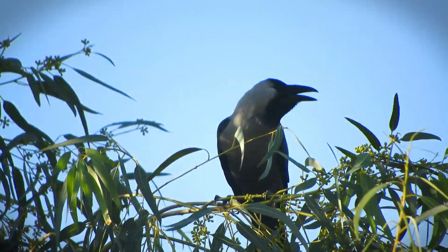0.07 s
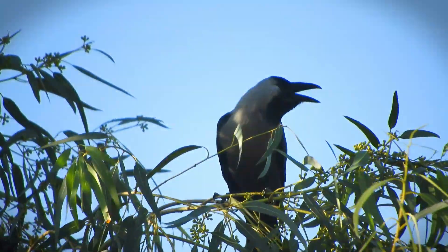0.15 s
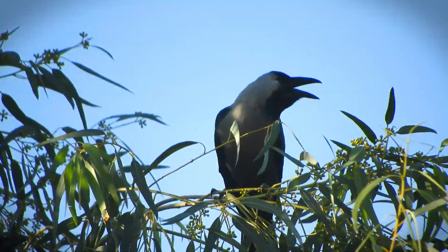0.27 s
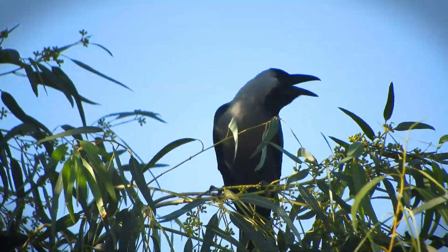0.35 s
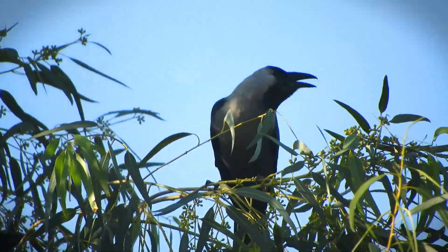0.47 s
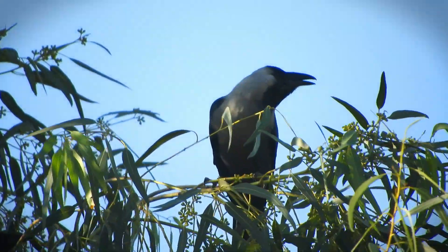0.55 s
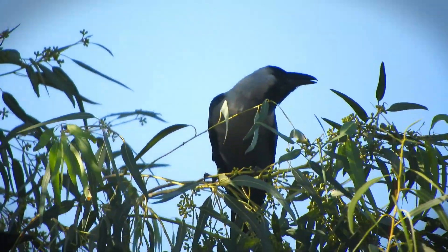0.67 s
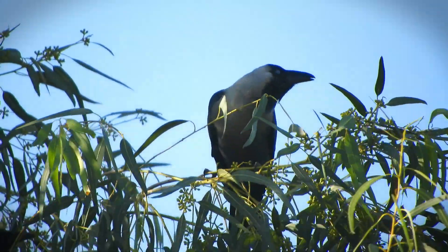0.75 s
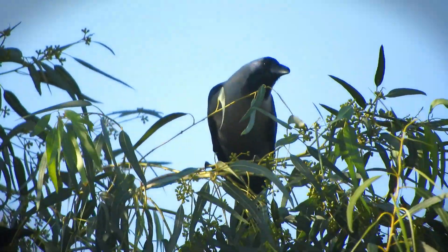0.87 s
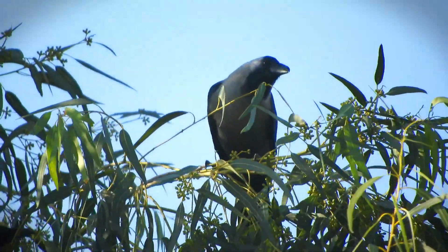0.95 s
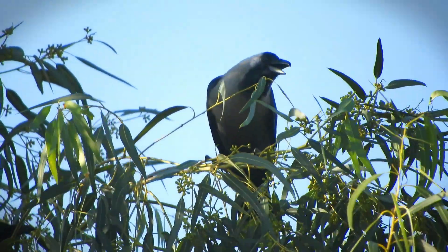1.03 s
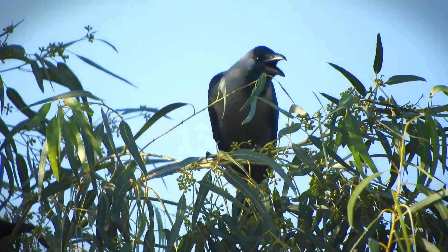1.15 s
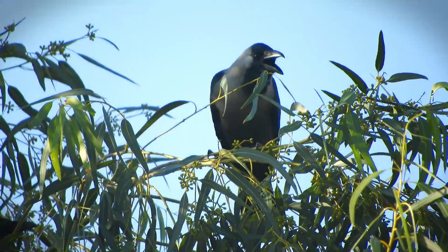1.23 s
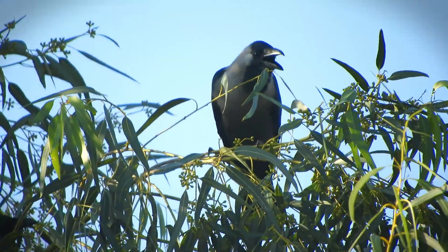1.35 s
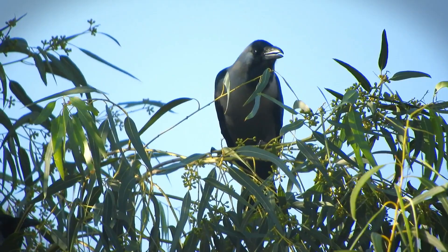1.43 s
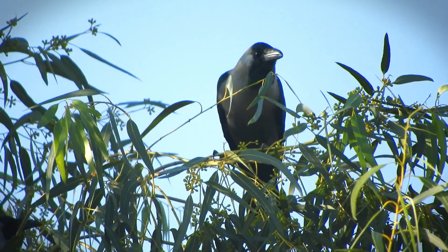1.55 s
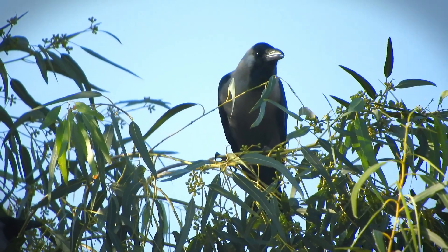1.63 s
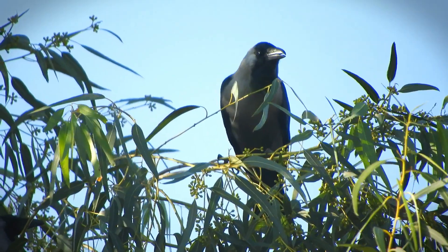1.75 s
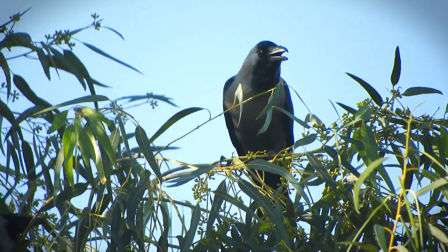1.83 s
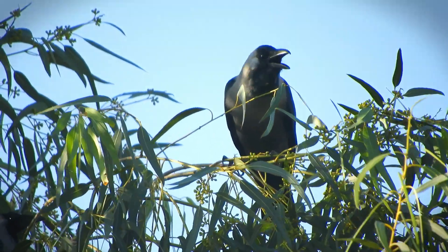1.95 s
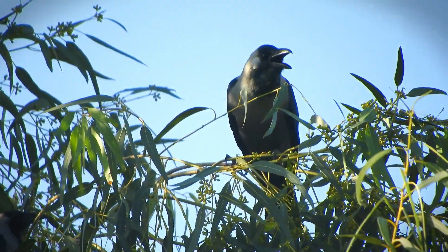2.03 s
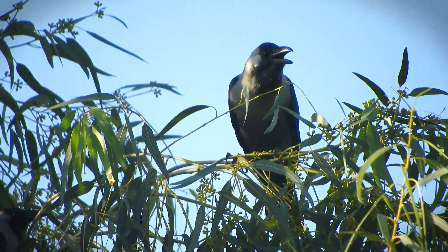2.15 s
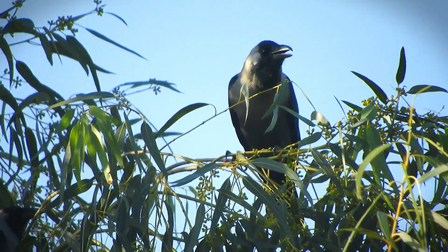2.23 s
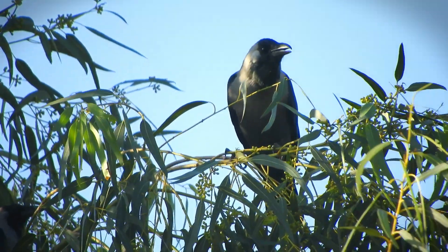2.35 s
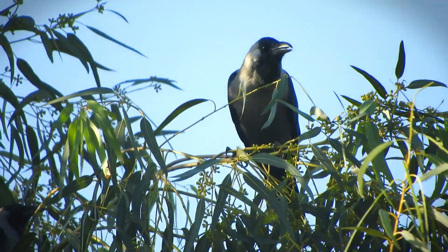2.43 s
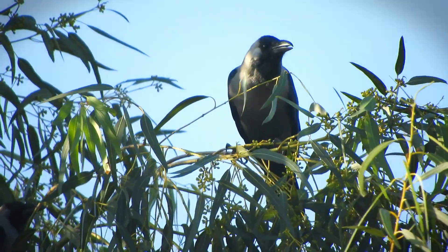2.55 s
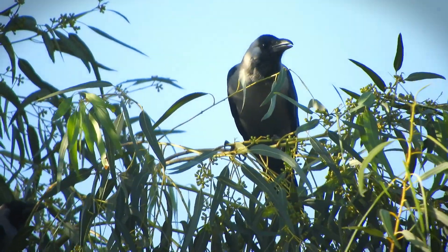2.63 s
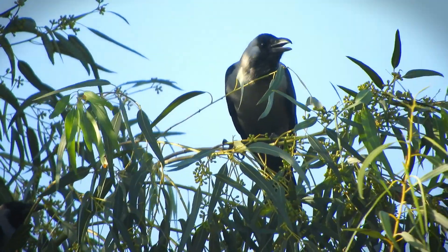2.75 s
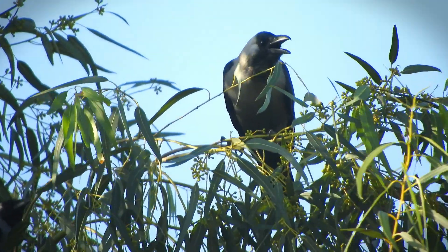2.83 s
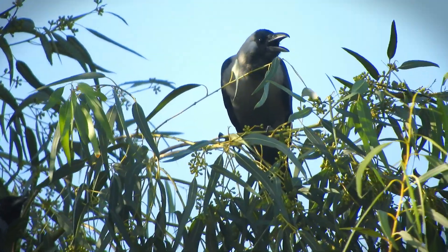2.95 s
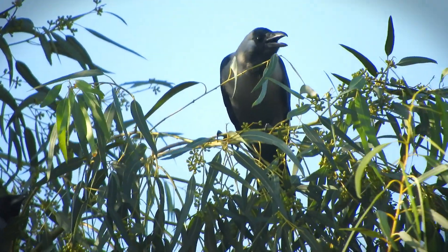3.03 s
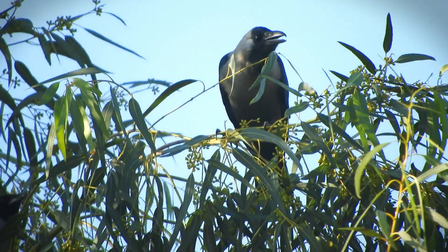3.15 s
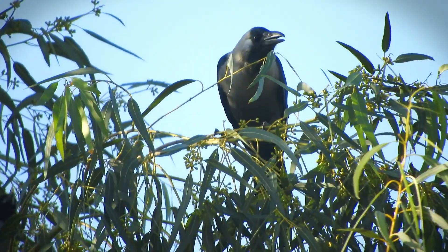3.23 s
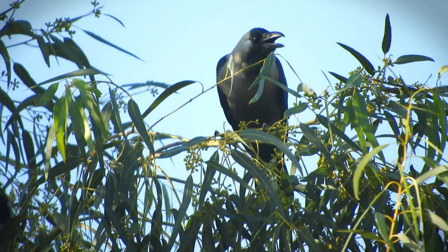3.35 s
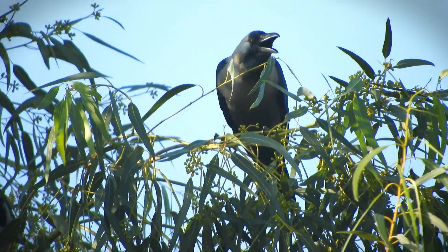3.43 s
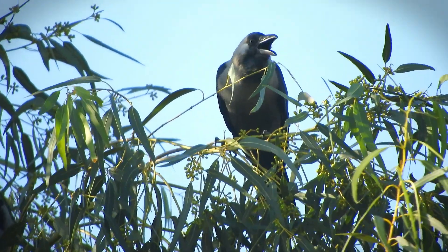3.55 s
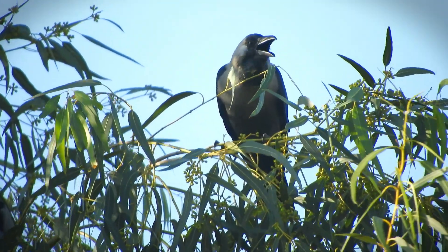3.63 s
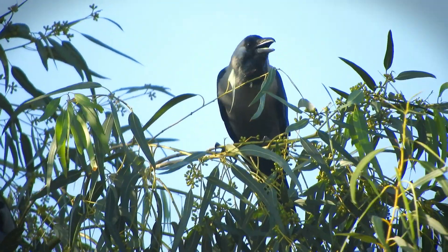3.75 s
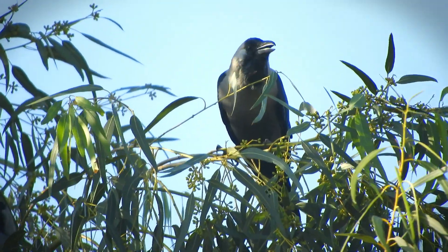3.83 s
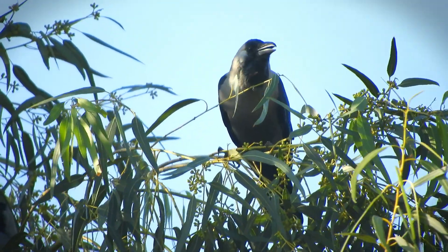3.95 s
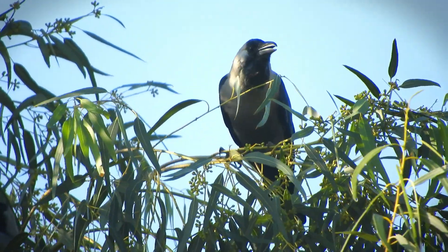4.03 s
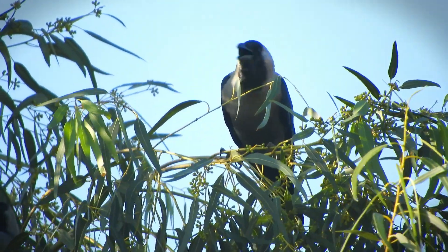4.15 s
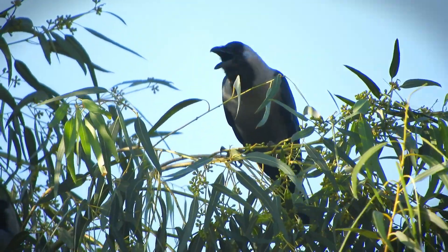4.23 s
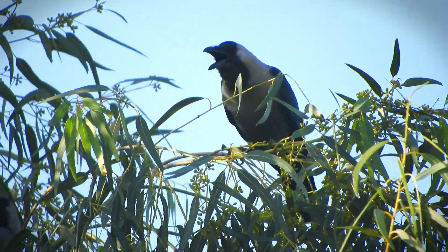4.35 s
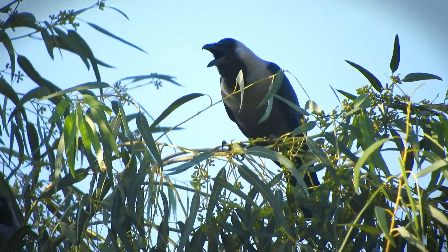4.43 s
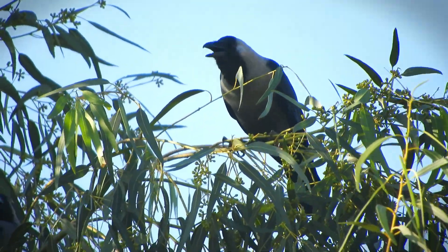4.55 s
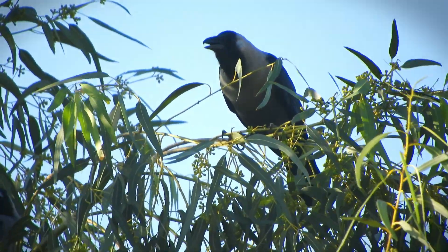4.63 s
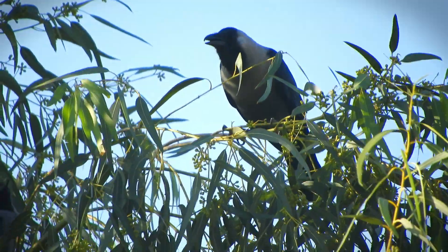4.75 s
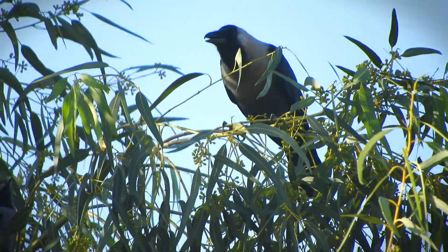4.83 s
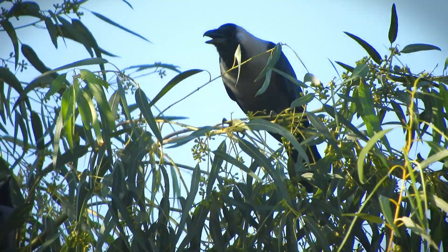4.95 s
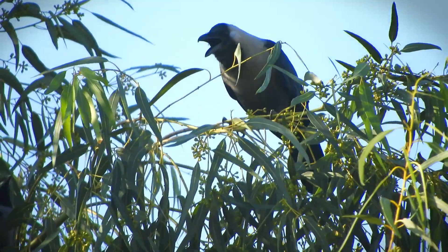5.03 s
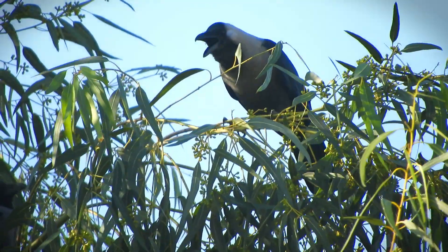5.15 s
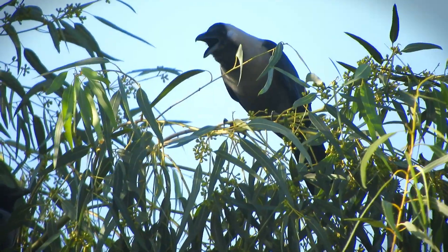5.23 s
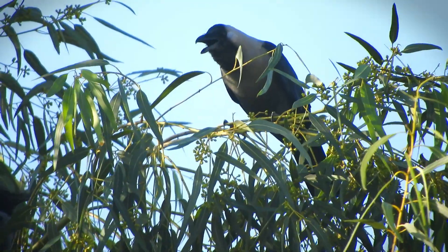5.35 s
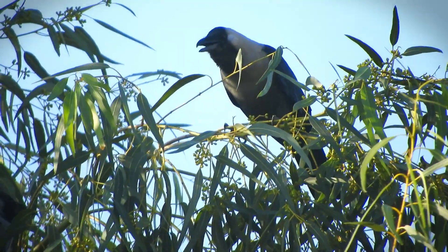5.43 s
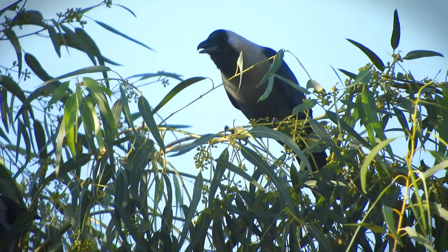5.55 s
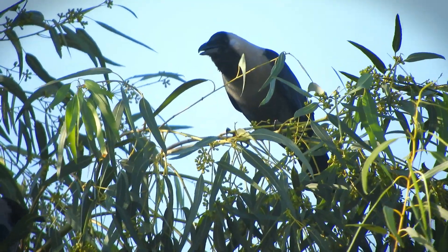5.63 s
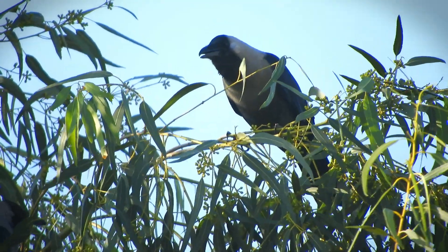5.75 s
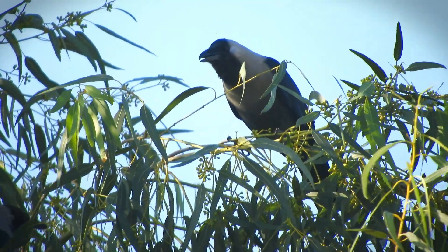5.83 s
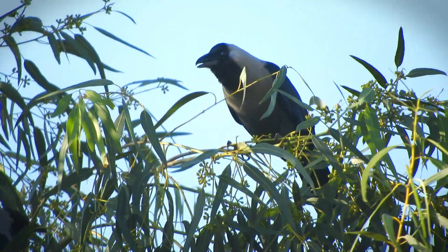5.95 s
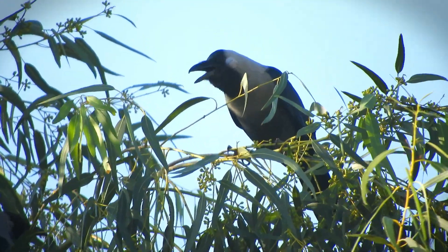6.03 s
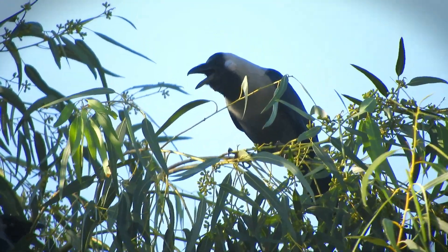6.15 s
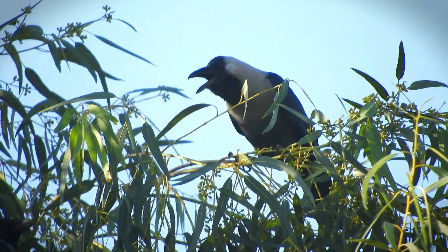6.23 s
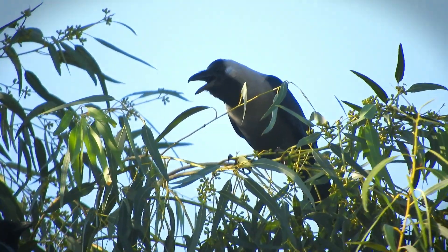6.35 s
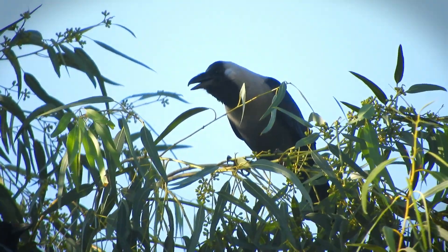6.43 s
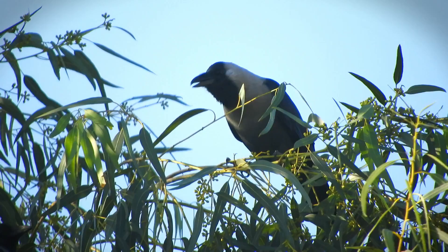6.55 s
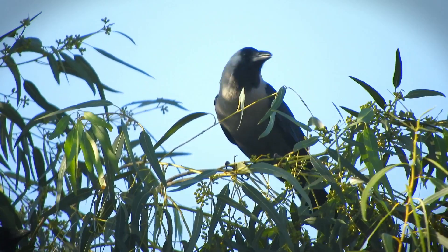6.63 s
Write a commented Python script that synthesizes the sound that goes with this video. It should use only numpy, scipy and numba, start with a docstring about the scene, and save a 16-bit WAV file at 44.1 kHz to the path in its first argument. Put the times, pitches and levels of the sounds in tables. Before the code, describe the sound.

Outdoors among leaves, crows caw in rough, nasal bursts of about four tenths of a second, first in pairs, then almost continuously and overlapping. Small birds add fast, sharp chirps and twitters, more frequent late. A very distant cock crows underneath, a few soft dull thumps come mostly in the later part, and a faint traffic rumble stays steady. Nearly mono, lightly reverberant.

```python
"""A small bird chips over the low hum of a town and at once a crow caws; more caws follow and overlap.
Each caw is a train of pulses near 440 Hz whose pitch is thrown up and down about 75 times a second;
the pulses ring throat, windpipe and beak, with a noisy rasp above them. Small birds are gliding whistles,
a far cock is a stack of harmonics, and the soft thumps, the town and its hum are filtered noise."""
import sys
import numpy as np
from scipy import signal
from scipy.fft import rfft, irfft
from scipy.io import wavfile
from scipy.ndimage import uniform_filter1d
from numba import njit

SR = 44100
rng = np.random.default_rng(int(sys.argv[2]) if len(sys.argv) > 2 else 0)


def int16_out(signal):
    """Quantize to a 16-bit WAV file."""
    q = np.round(np.clip(np.atleast_2d(signal).T, -1, 1) * 32767)
    wavfile.write(sys.argv[1], SR, q.astype(np.int16))


N = 294588
T = np.arange(N) / SR  # time in seconds

# One row per caw: start_s, crest_s, end_s, crest_pitch_hz, pitch_sag_at_ends (share), flutter_hz,
# roughness (0-1), level_db, beak_hz at mid-caw, then against the beak:
# throat_db, windpipe_db, rasp_db, low_rasp_db
CAWS = [ (.047, 0.197, .424, 415, 0.33, 75.8, 0.5, -27.5, 1865, -15, -13.5, -15.5, -36),
        (0.286, .51, .703, 423.5, .17, 70.1, 0.2, -23, 1720, -16, -18, -23, -48),
        (1.218, 1.469, 1.631, 427, 0.16, 67.35, 0.24, -21.5, 1743, -18, -19, -20, -40),
        (1.356, 1.558, 1.748, 443, 0.2, 80.25, 0.38, -24, 1845, -12, -16, -13, -39),
        (1.868, 2.081, 2.296, 430.2, 0.21, 75.54, 0.51, -23, 1826, -12.5, -15, -12.5, -25),
        (2.046, 2.248, 2.413, 426.2, .18, 69.04, 0.21, -22.5, 1700, -15.5, -26, -20.5, -29),
        (2.459, 2.676, 2.85, 432.7, 0.25, 78.46, 0.6, -22.5, 1804, -11, -22, -14, -25.5),
        (2.956, 3.211, 3.404, 460, 0.27, 78.8, 0.55, -19.5, 1853, -14, -17.5, -13, -24),
        (3.476, 3.709, 3.956, 475, 0.31, 79.7, 0.45, -18.5, 1940, -13.5, -16.5, -15.5, -30),
        (3.551, 3.813, 3.981, 438.2, 0.3, 74.07, 0.35, -17.5, 1804, -15, -27, -16, -24.5),
        (3.972, 4.217, 4.439, 446.4, .16, 77.15, 0.24, -21.5, 1900, -10.5, -19, -19, -25.5),
        (4.183, 4.461, 4.616, 453, 0.29, 78.6, 0.4, -18, 1950, -10, -10, -17.5, -19.5),
        (4.329, 4.519, 4.76, 426.8, .1, 70.7, 0.23, -19.5, 1790, -27, -32, -20.5, -33),
        (4.605, 4.868, 5.117, 457.5, 0.21, 81.8, 0.18, -20.5, 1980, -11, -12.5, -17.5, -21),
        (4.831, 5.019, 5.304, 439.6, 0.36, 75.6, .42, -26, 1805, -13, -22, -15, -14.5),
        (5.138, 5.421, 5.546, 440.1, 0.23, 76.75, 0.48, -20, 1774, -14.5, -9, -19, -23.5),
        (5.23, 5.539, 5.758, 445, .15, 76.86, 0.22, -18, 1860, -12, -25, -19.5, -23.5),
        (5.644, 5.841, 6.002, 428, 0.23, 77.2, 0.49, -24, 1840, -14, -20, -13.5, -22),
        (6.054, 6.286, 6.535, 450.5, 0.19, 76.17, 0.24, -19, 1885, -10.5, -21, -19.5, -26),
        (6.207, 6.399, 6.638, 438.5, 0.16, 74.15, .35, -22.5, 1810, -16.5, -24, -18, -19),
        (6.575, 6.803, 7.0, 441, 0.37, 78, 0.38, -30, 1810, -15, -15, -15, -30)]
# Colour of the rasp: frequency_hz, relative_level_db
RASP_COLOUR = [(2000, -72), (2700, -14), (3300, -12.5), (3800, -16), (4280, 2.5), (4800, -0.5),
               (5700, -3.5), (6800, -6), (8000, -6.5), (9000, -11.5), (10000, -21), (13000, -28.5),
               (15500, -44)]
# What the crow's airway lets through, most from 700 to 1150 Hz: frequency_hz, gain_db
TRACT = [(300, -27), (450, -13.5), (590, 3.5), (700, 9.5), (920, 9.5), (1030, 12), (1150, 9.5), (2200, 0.5),
         (2450, -7), (2800, -6), (4000, -8.5)]

# Song figures of the small birds, before each chirp's own pitch ratio and level:
# time_from_start_s, pitch_hz, level_db
TWITTER = [(0, 3147, 11), (.007, 6070, -12), (.014, 4900, -5.5), (.022, 3830, -7.5), (0.034, 5000, -3.5),
           (.045, 4334, 1), (.055, 3150, -6.5), (.063, 3390, -5.5), (.082, 4300, 0), (.102, 3300, -12)]
CHIP = [(0, 3270, -16.5), (0.014, 5560, -3.5), (0.027, 3930, -5.5), (0.036, 3100, -10), (0.047, 3660, -7),
        (0.067, 2600, -14)]
SLUR = [(0, 5200, -6), (.025, 4166, 3.5), (.045, 3200, -2.5), (.06, 2700, 4.5), (.1, 2550, 8),
        (.14, 1900, -3)]
DROP = [(0, 7300, -12), (0.023, 5100, 1), (.04, 3100, -6)]
ARCH = [(0, 3120, 4), (.01, 4400, 0), (0.028, 4200, 4.5), (.04, 3100, 1)]
CHURR = [(0, 2468, 11), (0.021, 2850, 9), (.05, 2590, 8), (.08, 2800, 3.5), (.11, 2650, -5)]
# When the small birds sing: start_s, figure, pitch_ratio, level_db, warble (share of the pitch)
CHIRPS = [ (.002, CHIP, 1, -26, 0.03), (0.321, DROP, 1, -30, 0.017), (0.38, ARCH, 0.97, -34, 0.047),
          (0.668, CHURR, 1.12, -57.5, 0.067), (1.026, TWITTER, 1.022, -26.5, 0.036),
          (1.921, TWITTER, 1.05, -24, 0.04), (2.392, SLUR, .95, -46.5, 0.025),
          (2.867, TWITTER, 1.033, -26.5, .05), (3.219, CHIP, .86, -28, 0.028),
          (3.456, CHURR, 1.01, -54, 0.034), (3.967, CHIP, 0.99, -27.5, 0.024),
          (4.696, SLUR, 1.01, -39, 0.019), (4.747, CHURR, 0.81, -36.5, 0.07),
          (4.96, CHIP, 0.87, -29.5, 0.029), (5.052, CHURR, 1.18, -42.5, 0.081),
          (5.343, SLUR, 0.93, -32, 0.017), (5.517, TWITTER, 1.08, -24.5, 0.064),
          (5.75, CHURR, 1.05, -45, 0.05), (5.925, SLUR, 0.99, -34, 0.031),
          (5.976, TWITTER, 1.1, -24, 0.052), (6.469, TWITTER, 0.99, -27, 0.0524),
          (6.52, CHURR, 0.99, -44.5, 0.025)]

# Path of the far cock's call: time_s, pitch_hz, level_db
COCK = [(1.72, 675, -79), (1.79, 703, -49), (1.86, 725, -51), (1.92, 696, -55), (2.1, 815, -42),
        (2.3, 820, -43.5), (2.48, 840, -39.5), (2.62, 827, -43), (2.76, 811, -52), (2.87, 795, -46),
        (2.98, 788, -42.5), (3.15, 790, -51)]
# Peaks and dips of the cock's throat: frequency_hz, gain_db
COCK_THROAT = [(700, 5.5), (800, -10.5), (1400, -1), (1600, 4.5), (2350, -22), (2500, -0.5), (2800, -13),
               (3140, -2), (3300, -13)]
# Soft low thumps: centre_s, level_db, spread_s, filter_centre_hz, filter_width_hz
THUMPS = [(0.73, -43.5, 0.019, 340, 136), (4.43, -41.5, 0.06, 390, 87), (5.095, -40, 0.016, 390, 103),
          (5.23, -29.5, 0.027, 336, 277), (5.338, -38.5, 0.039, 312, 219.6), (5.74, -41, 0.023, 370, 89),
          (6.144, -36, 0.021, 334, 109)]
# Colour of the town's wash: frequency_hz, relative_level_db (per Hz)
TOWN_COLOUR = [(25, -14), (45, -15.5), (65, -1.5), (110, -5), (200, 1), (260, -14.5), (380, -22),
               (650, -14.5), (950, -21), (1700, -15.5), (2800, -26), (5000, -22), (8000, -27.5),
               (15000, -45.5)]
# Hum of the town: centre_hz, filter_width_hz, level_db
HUM = [(101.5, 41, -57.5), (172.8, 23, -52.5)]

# Colours of the echo, the left-right scatter and the left-right hiss: frequency_hz, gain_db
ECHO_COLOUR = [(500, 0), (3000, 0), (10000, -4)]
SCATTER_COLOUR = [(800, -19.5), (1800, -33.0), (3000, -16.0), (5000, -17.5), (8000, -8.0), (12000, -17.5)]
HISS_COLOUR = [(40, -24.0), (180, -14), (400, -23.5), (1500, -22.0), (6000, -25.5), (10000, -32.5),
               (15000, -44)]

# Every caw swells, holds a rounded top and breaks off
ATTACK_S, ATTACK_CURVE = .13, 1.26
RELEASE_S, RELEASE_CURVE = 0.077, 1.61
DOME_DB = 7  # the middle over the two ends
# As the push gives out the pitch collapses: share lost, time constant in seconds
PITCH_DROP, DROP_S = .22, .035
THROAT_HZ = 792  # at mid-caw; it moves with the beak
BEAK_RISE, BEAK_SAG = 0.081, 0.088  # the beak's movement, as shares of its resonance
WAVER_DB, WAVER_RATE = 2.5, 18  # chance waver of throat and windpipe; changes a second
# How steeply each part follows the push: throat and windpipe speak first and last, the rasp needs force
THROAT_POWER, WINDPIPE_POWER, RASP_POWER = 0.94, 0.73, 1.08
TOWN_DB = -45.5
TOP_HZ = 15200


def undb(db):
    """Decibels to gain."""
    return 10 ** (np.asarray(db) / 20)


def unit(x):
    """Scale to an rms level of 1."""
    return x / np.sqrt(np.mean(x ** 2))


def curves(rows, t=T):
    """Join the columns of a table by straight lines in time."""
    s, *columns = np.transpose(rows)
    return [np.interp(t, s, column) for column in columns]


def walk(rate, size=N):
    """Smooth random wandering with rms 1 that heads for a new value rate times a second."""
    step = max(int(SR / rate), 2)
    held = np.repeat(rng.standard_normal(size // step + 1), step)
    return unit(uniform_filter1d(held, step))[:size]


def colour(x, points):
    """Filter by (Hz, dB) points, with no sound ahead of its cause."""
    hz, db = np.transpose(points)
    grid_hz = np.linspace(1, SR / 2, 2049)
    gain = undb(np.interp(np.log(grid_hz), np.log(hz), db))
    # folding the cepstrum forward gives the minimum-phase filter
    cepstrum = irfft(np.log(gain))
    cepstrum[1:2048] *= 2
    cepstrum[2049:] = 0
    impulse = irfft(np.exp(rfft(cepstrum)))
    return signal.fftconvolve(x, impulse)[:len(x)]


@njit
def svf(x, hz, width):
    """State-variable band-pass whose centre may move."""
    y, band, low = np.empty(len(x)), 0., 0.
    for i in range(len(x)):
        g, k = np.tan(np.pi * hz[i] / SR), width / hz[i]
        v = (band + g * (x[i] + 1e-18 - low)) / (1 + g * (g + k))
        band, low, y[i] = 2 * v - band, low + 2 * g * v, k * v
    return y


def resonance(x, hz, width_hz):
    """A steep resonance: the band-pass twice."""
    hz = hz * np.ones(len(x))
    once = svf(x, hz, float(width_hz))
    return svf(once, hz, float(width_hz))


def steady(x, span_s=0.067):
    """Even out the slow level but keep the quick flutter."""
    power = uniform_filter1d(x ** 2, int(span_s * SR))
    return x / np.sqrt(np.abs(power) + .015 * np.mean(x ** 2))


def crows():
    """The caws of several birds, one over another."""
    out = np.zeros(N)
    for start, crest, end, *voice in CAWS:
        span = (T >= start) & (T < end)
        out[span] += caw(T[span], start, crest, end, *voice)
    return out


def caw(t, start, crest, end, pitch_hz, sag, flutter_hz, rough, db, beak_hz,
        throat_db, windpipe_db, rasp_db, low_rasp_db):
    """One push of air through syrinx, throat, windpipe and beak, with a rasp above them."""
    size = len(t)
    along = np.interp(t, [start, end], [-1, 1])
    attack = np.clip((t - start) / ATTACK_S, 0, 1) ** ATTACK_CURVE
    release = np.clip((end - t) / RELEASE_S, 0, 1) ** RELEASE_CURVE
    push = attack * release * undb(-DOME_DB * along ** 2)

    from_crest = np.interp(t, [start, crest, end], [-1, 0, 1])
    arch = (1 - sag * from_crest ** 2) * (1 - PITCH_DROP * np.exp((t - end) / DROP_S))
    voice, air = syrinx(arch, pitch_hz, flutter_hz, rough)
    tract = colour(voice, TRACT)

    opening = 1 + BEAK_RISE * along - BEAK_SAG * along ** 2
    beak = resonance(tract, beak_hz * opening, 615) + undb(-16) * resonance(tract, 2163, 255)
    beak = push * steady(beak)

    throat_gain = undb(throat_db + WAVER_DB * walk(WAVER_RATE, size)) * push ** THROAT_POWER
    throat = throat_gain * steady(resonance(tract, THROAT_HZ * opening, 550))
    windpipe_gain = undb(windpipe_db + WAVER_DB * walk(WAVER_RATE, size)) * push ** WINDPIPE_POWER
    windpipe = windpipe_gain * steady(resonance(tract, 1325, 183))

    rasp = undb(rasp_db) * steady(colour(air, RASP_COLOUR))
    rasp = rasp + undb(low_rasp_db) * steady(resonance(air, 3340, 1160))
    return undb(db) * (beak + throat + windpipe + push ** RASP_POWER * rasp)


def syrinx(arch, pitch_hz, flutter_hz, rough, throb_db=1.45, throb_lead=0.93, rasp_throb_db=2.0,
           rasp_lead=2.7, ring=1.95, whistle=2.1):
    """The voice box makes pulses, and air whose hiss starts afresh with each cycle of the pitch."""
    # arch is the pitch as a share of pitch_hz; the two leads are in radians
    size = len(arch)
    rough = np.clip(rough, .1, .6)
    clear = (1 - rough) ** 4

    # a slower second vibration jerks the pitch up and lets it slide down again
    flutter_rate = flutter_hz * np.sqrt(arch) * (1 + .14 * rough * walk(70, size))
    flutter = 2 * np.pi * np.cumsum(flutter_rate) / SR
    slide = (.075 + .05 * rough) * (np.sin(flutter) + .15 * np.sin(2 * flutter))
    jitter = .042 * rough * walk(350, size)
    cycles = np.cumsum(pitch_hz * arch * (1 + slide + jitter)) / SR

    # one pulse a cycle, shared between the two nearest samples
    closures = np.interp(np.arange(1, cycles[-1]), cycles, np.arange(size))
    strength = undb(4.5 * rough * rng.standard_normal(size)[:len(closures)])
    sample, fraction = closures.astype(int), closures % 1
    pulses = np.zeros(size + 1)
    np.add.at(pulses, sample, strength * (1 - fraction))
    np.add.at(pulses, sample + 1, strength * fraction)
    pulses = unit(pulses[:size])
    air = unit(np.exp(-(cycles % 1) / 1.34) * rng.standard_normal(size))

    voice = (pulses + .8 * rough ** 2 * air) * undb(-throb_db * np.cos(flutter + throb_lead))
    # in a clear caw the tract is tuned near the fourth harmonic and rings with it
    voice = voice + ring * clear * resonance(voice, 4.07 * pitch_hz * np.sqrt(arch), 220)

    rasp = (0.32 * pulses + air) * undb(-rasp_throb_db * np.cos(flutter + rasp_lead))
    # a hoarse caw hisses high, a clear one rings a windpipe mode
    high_hiss = 2.5 * rough * resonance(rasp, 6200, 3000)
    windpipe_mode = whistle * clear * resonance(pulses, 4300, 350)
    return voice, rasp + high_hiss + windpipe_mode


def small_birds(overtone_db=-27, second_voice_db=-7, second_ratio=0.88, flicker_db=3):
    """Quick whistles; in a twitter the other side of the syrinx sings along a little lower."""
    out = np.zeros(N)
    for start, figure, ratio, db, warble in CHIRPS:
        span = (T >= start) & (T < start + figure[-1][0])
        hz, shape_db = curves(figure, T[span] - start)
        size = len(hz)
        pitch = uniform_filter1d(hz, 200) * ratio * (1 + warble * walk(600, size))
        phase = 2 * np.pi * np.cumsum(pitch) / SR
        tone = np.sin(phase) + undb(overtone_db) * np.sin(2 * phase)
        if figure is TWITTER:
            tone = tone + undb(second_voice_db) * np.sin(second_ratio * phase)
        level = undb(db + shape_db + flicker_db * walk(300, size))
        out[span] += level * signal.windows.tukey(size, .1) * tone
    return out


def cock(count=4):
    """One long call, hoarse then clear, whose harmonics slide through the throat's peaks."""
    hz, db = curves(COCK)
    waver = np.where(hz < 750, .045, .006) * walk(260)  # the low start is hoarse
    phase = 2 * np.pi * np.cumsum(hz * (1 + waver)) / SR
    tone = np.zeros(N)
    for k in range(1, count + 1):
        throat_db = np.interp(k * hz, *np.transpose(COCK_THROAT))
        tone += undb(throat_db + 3.0 * walk(24.97)) * np.sin(k * phase)
    calling = (T > COCK[0][0]) & (T < COCK[-1][0])
    return tone * undb(db) * calling


def thumps():
    """Short dull puffs: band-passed noise under a bell-shaped swell."""
    out = np.zeros(N)
    for s, db, spread_s, hz, width_hz in THUMPS:
        bell = np.exp(-.5 * ((T - s) / spread_s) ** 2)
        out += undb(db) * bell * unit(resonance(rng.standard_normal(N), hz, width_hz))
    return out


def town():
    """A soft noise wash of far traffic with a wavering hum; its low middle swells and fades."""
    wash = unit(colour(rng.standard_normal(N), TOWN_COLOUR)) * undb(TOWN_DB + .5 * walk(2.41))
    swell = unit(resonance(rng.standard_normal(N), 370.5, 127)) * undb(-55.5 + 4.1 * walk(11))
    hum = np.zeros(N)
    for hz, width_hz, db in HUM:
        hum += undb(db) * unit(resonance(rng.standard_normal(N), hz, width_hz))
    return wash + swell + hum


def surroundings(x, t60_s=0.46, delay_s=0.0056):
    """Leaves and house fronts scatter back a short dull tail, made of fading noise."""
    t = T[:SR]
    tail = rng.standard_normal(SR) * undb(-60 * t / t60_s) * (t > delay_s)
    scattered = signal.fftconvolve(x, tail / np.linalg.norm(tail))[:N]
    return colour(scattered, ECHO_COLOUR)


def scene():
    """Everything lies straight ahead; only a little scatter and hiss differ between the ears."""
    calls, chirps = crows(), small_birds()
    echo = surroundings(undb(-15) * calls + undb(-10) * chirps)
    middle = calls + chirps + echo + cock() + thumps() + town()
    scatter = surroundings(calls + chirps, t60_s=0.066, delay_s=0.0016)
    scatter = colour(scatter, SCATTER_COLOUR)
    hiss = undb(-52.5) * unit(colour(rng.standard_normal(N), HISS_COLOUR))
    # added on one side, taken away on the other
    return middle + (scatter + hiss) * np.array([[1], [-1]])


def record(dry):
    """A steep low-pass takes away the very top of the treble."""
    low_pass = signal.ellip(8, .2, 70, TOP_HZ, fs=SR, output="sos")
    return signal.sosfilt(low_pass, dry)


dry = scene()
out = record(dry)
int16_out(out)
```